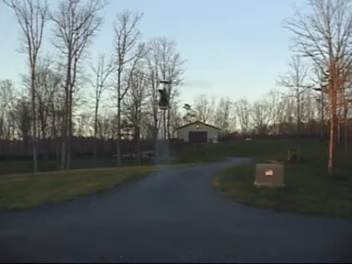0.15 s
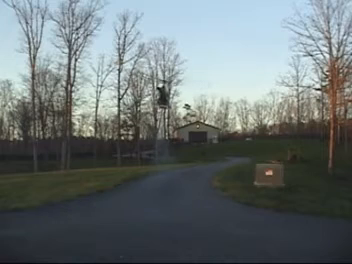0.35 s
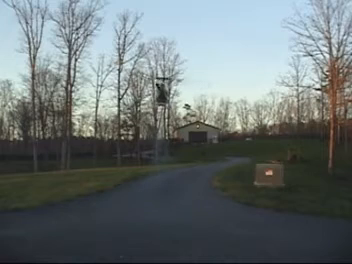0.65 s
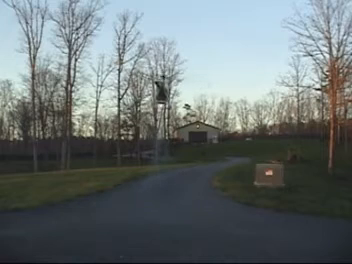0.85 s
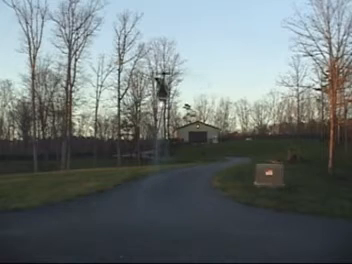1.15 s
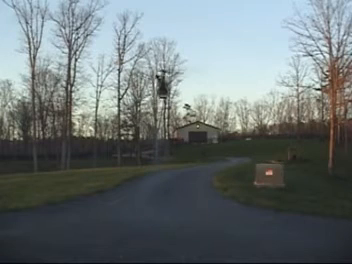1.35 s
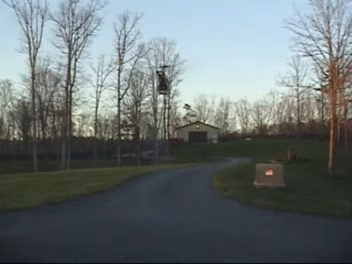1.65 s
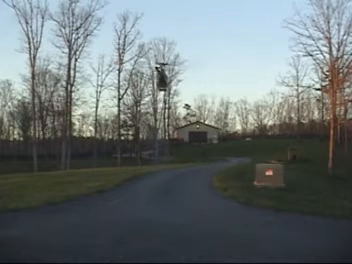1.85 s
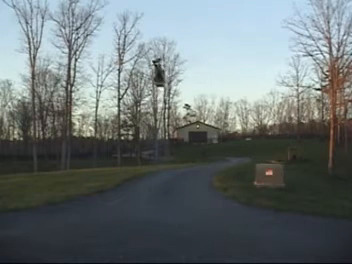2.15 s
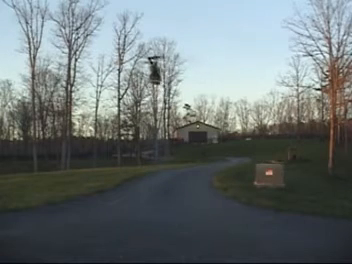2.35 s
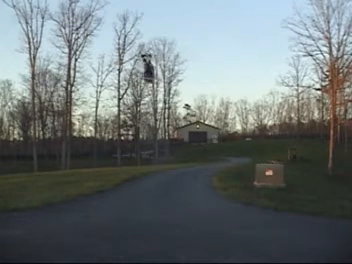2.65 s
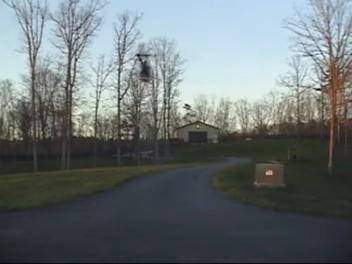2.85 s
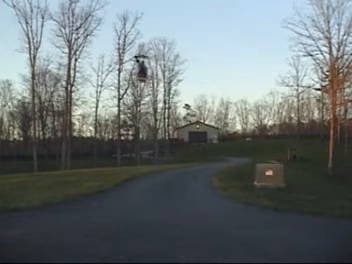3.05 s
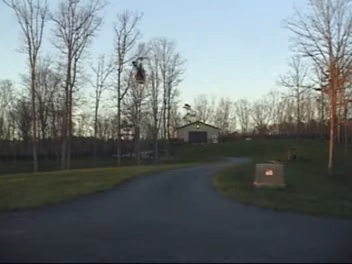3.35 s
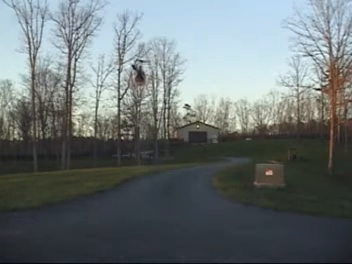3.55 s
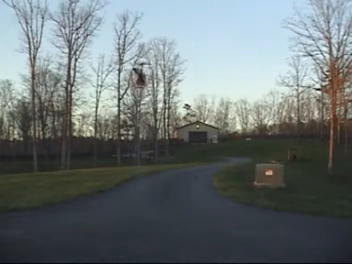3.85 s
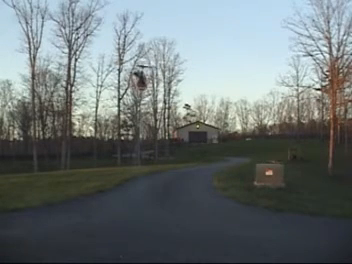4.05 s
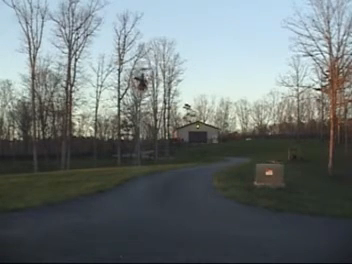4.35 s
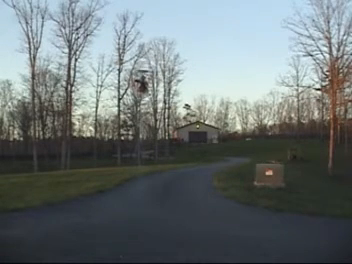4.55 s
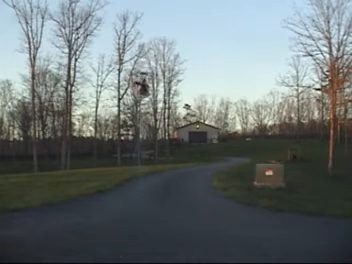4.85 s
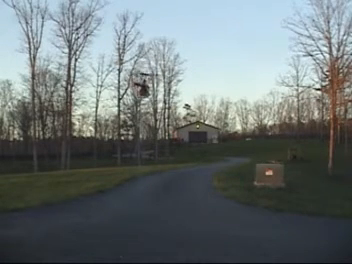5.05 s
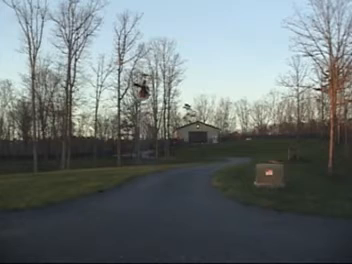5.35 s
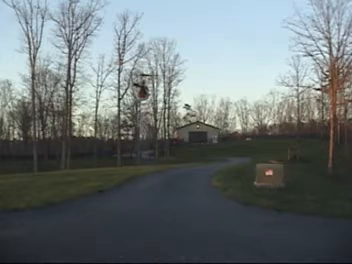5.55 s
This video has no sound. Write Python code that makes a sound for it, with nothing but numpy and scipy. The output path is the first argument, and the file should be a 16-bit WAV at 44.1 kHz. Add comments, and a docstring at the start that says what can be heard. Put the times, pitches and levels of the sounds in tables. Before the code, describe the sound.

A model helicopter's small engine buzzes and rasps throughout at an almost constant pitch, joined by whining gears and the rapid, hissing flutter of its blades. The sound shifts softly in colour during a short climb and descent, and a tinny exhaust ring grows a little as the throttle opens in the second half. It is heard in the open air, with a thin echo from nearby woods.

```python
"""A buzzing, rasping two-stroke glow engine: a model helicopter hovers, climbs a little and sinks back.
Each firing drives the exhaust and rings the silencer; the main gear's teeth whine as they mesh.
The rotor chops these tones, swishes and whistles once a turn.
The paved drive below reflects everything a moment later, so the colour sweeps with the height.
The throttle opens to stop the descent, and the exhaust grows louder and rings more."""
import sys
import numpy as np
from scipy import signal
from scipy.fft import rfft, irfft, next_fast_len
from scipy.io import wavfile
from scipy.ndimage import map_coordinates

SR = 44100
rng = np.random.default_rng(int(sys.argv[2]) if len(sys.argv) > 2 else 0)


def file_out(sig):
    """Save sig as 16-bit WAV at sys.argv[1]."""
    # one column per channel
    cols = np.atleast_2d(sig).T
    # limit, then scale
    lim = np.clip(cols, -1, 1)
    pcm = np.round(lim * 32767).astype(np.int16)
    wavfile.write(sys.argv[1], SR, pcm)


N = 250929
T = np.arange(N) / SR


def amp(db):
    """Decibels to gain."""
    return 10 ** (np.asarray(db) / 20)


def unit(x):
    """Scale to rms 1."""
    return x / np.sqrt(np.mean(x ** 2) + 1e-20)


def along(points, hz):
    """(f/Hz, value) points read on a log axis."""
    f, v = np.transpose(points)
    return np.interp(np.log(hz + 1), np.log(f + 1), v)


def wobble(knots_per_s):
    """Smooth random curve."""
    return map_coordinates(rng.standard_normal(int(N * knots_per_s / SR) + 4), [T * knots_per_s])


def filtered(x, response):
    """Apply a complex frequency response."""
    size = next_fast_len(N + 8192)
    return irfft(rfft(x, size) * response(np.fft.rfftfreq(size, 1 / SR)), size)[:N]


def resonate(x, modes):
    """Parallel resonances of alternating sign."""
    return filtered(x, lambda f: sum(
        (-1) ** k * amp(db) * 1j * f * width / (hz * hz - f * f + 1j * f * width)
        for k, (hz, width, db) in enumerate(modes)))


def noise(spectrum):
    """Coloured noise, rms 1."""
    return unit(filtered(rng.standard_normal(N), lambda hz: amp(along(spectrum, hz))))


def tone(cycles):
    """Sine on a cycle count, rms 1."""
    return np.sqrt(2) * np.sin(2 * np.pi * (cycles + rng.random()))


def offset(turns, moment):
    """Signed distance in turns from a moment of the revolution."""
    return (turns - moment + .5) % 1 - .5


def chopped(cycles, rotor, db, lower_db, upper_db):
    """Tone swayed once a rotor turn: sidebands of opposite sign, so mostly vibrato."""
    sway = np.exp(2j * np.pi * rotor)
    phasor = amp(db) + amp(upper_db) * sway - amp(lower_db) / sway
    return np.sqrt(2) * np.imag(phasor * np.exp(2j * np.pi * (cycles + rng.random())))


def climb(top_s=2.74, half_width_s=1.27):
    """Height: 0 in the hover, 1 at the top."""
    return np.exp(-((T - top_s) / half_width_s) ** 2)


def level(hover_db, climb_db, throttle_db, open_s=3.74, rise_s=0.26):
    """Level in dB, following the height and the throttle, which opens and stays open."""
    throttle = .5 + .5 * np.tanh((T - open_s) / rise_s)
    return hover_db + climb_db * climb() + throttle_db * throttle


# Echo decay: f/Hz, T60/s
TREE_DECAY = [(200, 0.57), (2000, 0.26), (10000, 0.037)]


def trees(x):
    """Thin diffuse echo from the wood's edge."""
    hz, t, spectra = signal.stft(rng.standard_normal(SR // 2), SR, nperseg=256)
    decay = amp(-60 * t / along(TREE_DECAY, hz)[:, None])
    tail = signal.istft(spectra * decay, SR, nperseg=256)[1]
    return signal.fftconvolve(x, tail / np.linalg.norm(tail))[:N]


def pavement(x, reflect, dull_hz, extra_ms):
    """Direct sound plus a late, duller reflection; each sound has its own slight extra delay."""
    hover_ms, creep_ms_per_s, climb_ms = 1.187, 0.0079, 0.24
    lag_ms = hover_ms + creep_ms_per_s * T + climb_ms * climb() + extra_ms
    dulled = filtered(x, lambda hz: 1 / np.sqrt(1 + (hz / dull_hz) ** 2))
    return x + reflect * map_coordinates(dulled, [(T - lag_ms / 1000) * SR], mode="mirror")


# Thrum: rotor order, level/dB
THRUM_TONES = [(1, -102), (2, -69.5), (3, -90), (4, -73), (5, -73.5), (6, -72.5), (10, -62.5)]


def rotor_thrum(rotor):
    """Faint low harmonics of the rotor speed."""
    return sum(amp(db) * tone(round(order) * rotor) for order, db in THRUM_TONES)


# Blade noise: f/Hz, relative density/dB
WASH_SPECTRUM = [(20, -18), (60, -16.5), (140, -11), (230, -11), (400, -7.5), (600, -7.5), (1200, -1.5),
                 (2500, 0), (4800, -6), (6300, -2), (9500, -4), (11000, -12), (13000, -21.5), (15000, -41)]
SWISH_SPECTRUM = [(500, -53), (3000, -49), (6500, -0.5), (10000, 0.5), (11500, -14), (15000, -42)]
# Wash level: hover/dB, change at top/dB, change on throttle/dB
WASH_LEVEL_DB = (-36.5, -0.02, -0.32)


def rotor_wash(rotor, swish_db=-1.5, swish_turns=0.077, beat_depth=0.033):
    """Wash that beats with both blades; a swish as the quieter blade comes forward."""
    beat = 1 + beat_depth * np.cos(2 * np.pi * 2 * (rotor - .26))
    wash = noise(WASH_SPECTRUM) * beat
    swish = noise(SWISH_SPECTRUM) * np.exp(-(offset(rotor, 0.773) / swish_turns) ** 2)
    return amp(level(*WASH_LEVEL_DB)) * (wash + amp(swish_db) * swish)


# Whistles: moment of top pitch/turns, top f/Hz, peak level/dB, half-width/turns
EDGE_TONES = [(0.312, 9540, -38.5, 0.18), (.33, 8215, -40, 0.085), (.80, 13400, -61, .12)]


def blade_whistles(rotor, mach=0.22, waver=0.017, lead_turns=0.076, scatter_db=1.5):
    """Edge tones on a blade, Doppler-lifted into an arc on each swing towards the listener."""
    out = np.zeros(N)
    for moment, top_hz, db, width_turns in EDGE_TONES:
        turns = offset(rotor, moment)
        hz = top_hz * (1 - mach) / (1 - mach * np.cos(2 * np.pi * turns))
        hz *= 1 + waver * wobble(1500) + 0.011 * wobble(30)
        beam = np.exp(-((turns + lead_turns) / width_turns) ** 2)
        out += amp(db + scatter_db * wobble(40)) * beam * tone(np.cumsum(hz) / SR)
    wash_db = level(*WASH_LEVEL_DB)
    return amp(2 * (wash_db - wash_db.mean())) * out  # swells with the wash, twice the dB


# Faint drive-train tones: crank order, relative level/dB
DRIVE_TONES = [(.66, -65), (2.52, -58.5), (3.52, -60), (10.89, -55)]
# Gear gain: hover/dB, change at top/dB, change on throttle/dB
GEAR_GAIN_DB = (-0.95, -1.2, 0)


def gear_whine(crank, rotor, teeth=90):
    """Main gear mesh, swayed by the rotor and by the pinion on the crankshaft."""
    mesh = teeth * rotor + .04 * wobble(45)
    whine = chopped(mesh, rotor, db=-45.5, lower_db=-58, upper_db=-50)
    pinion = amp(-48) * tone(mesh - crank)
    overtone = chopped(2 * mesh + .12 * wobble(120), rotor, db=-53.5, lower_db=-55, upper_db=-56)
    drive = sum(amp(db) * tone(order * crank + 0.05 * wobble(20)) for order, db in DRIVE_TONES)
    return amp(level(*GEAR_GAIN_DB)) * (whine + pinion + overtone + drive)


def firings(crank, scatter_db):
    """One impulse a revolution, uneven in strength and sign, rms 1."""
    fired = np.flatnonzero(np.diff(np.floor(crank)))
    out = np.zeros(N)
    out[fired] = amp(scatter_db * rng.standard_normal(len(fired)))
    out[fired] *= np.sign(rng.standard_normal(len(fired)))
    return unit(out)


# Silencer wall: f/Hz, width/Hz, relative gain/dB
WALL_MODES = [(4083, 140, 7), (5600, 400, -14)]
# Ring level: hover/dB, change at top/dB, change on throttle/dB
RING_LEVEL_DB = (-47.5, -0.5, 3.5)


def silencer_ring(crank):
    """Firings ring the silencer's thin wall."""
    ring = resonate(firings(crank, scatter_db=2.5), WALL_MODES)
    return amp(level(*RING_LEVEL_DB)) * unit(ring)


# Silencer and airframe: f/Hz, width/Hz, relative gain/dB
SILENCER_MODES = [(740, 580, -7.5), (1330, 1100, -9.5), (1953, 190, 6.5), (3190, 610, -4), (4125, 340, -3),
                  (5410, 340, -1.5), (7990, 330, -4.5)]
# Rasp level: hover/dB, change at top/dB, change on throttle/dB
RASP_LEVEL_DB = (-40, -0.4, 1)


def exhaust_rasp(crank, puff_turns=0.39, puff_gain=1.2):
    """Each firing sends a crack and a puff of gas through the silencer."""
    puffs = unit(rng.standard_normal(N) * np.exp(-(crank % 1) / puff_turns))
    cracks = firings(crank, scatter_db=3.5)
    rasp = resonate(cracks + puff_gain * puffs, SILENCER_MODES)
    return amp(level(*RASP_LEVEL_DB)) * unit(rasp)


# Exhaust tones, relative levels: crank order, carrier/dB, lower sideband/dB, upper sideband/dB
FIRING_TONES = [(1, -50, -74, -74), (2, -58, -72, -65), (3, -57, -56, -56), (4, -44.1, -62, -48.8),
                (5, -53.5, -64, -61), (6, -50.8, -56.5, -59), (7, -49.5, -51, -51), (8, -62, -60, -62),
                (9, -62, -59, -60)]
# Buzz gain: hover/dB, change at top/dB, change on throttle/dB
BUZZ_GAIN_DB = (-0.8, 0.46, 0.94)


def exhaust_buzz(crank, rotor, jitter_turns=.004, flicker_db=0.14):
    """Firing harmonics, chopped by the rotor; uneven combustion makes each flicker."""
    crank = crank + jitter_turns * wobble(60)
    buzz = sum(amp(flicker_db * wobble(25)) * chopped(round(order) * crank, rotor, *levels_db)
               for order, *levels_db in FIRING_TONES)
    passes = 2 * rotor  # two blades pass under the exhaust each turn
    buzz += amp(-60) * tone(crank + passes)
    buzz += amp(-59.5) * tone(crank + 2 * passes)
    buzz += amp(-62) * tone(2 * crank + passes)
    return amp(level(*BUZZ_GAIN_DB)) * buzz


# Engine speed, up into the climb, sagging on descent, recovering: t/s, f/Hz
ENGINE_SPEED = [(0, 230.45), (1.5, 232.07), (2.35, 231.69), (3.5, 230.43), (4.55, 230.93), (5.1, 231.79),
                (5.69, 231.84)]


def scene(gear_ratio=9.614):
    """One crankshaft drives every part; crank and rotor count turns."""
    engine_hz = np.interp(T, *np.transpose(ENGINE_SPEED))
    crank = np.cumsum(engine_hz) / SR
    rotor = crank / gear_ratio
    buzz = exhaust_buzz(crank, rotor)
    whine = gear_whine(crank, rotor)
    thrum = rotor_thrum(rotor)
    silencer = exhaust_rasp(crank) + silencer_ring(crank)
    blades = thrum + rotor_wash(rotor) + blade_whistles(rotor)
    helicopter = (pavement(blades, reflect=0.33, dull_hz=4500, extra_ms=0.063)
                  + pavement(whine, reflect=0.63, dull_hz=6000, extra_ms=0.098)
                  + pavement(silencer, reflect=0.55, dull_hz=3980, extra_ms=0)
                  + pavement(buzz, reflect=0.69, dull_hz=6000, extra_ms=0.048))
    return (helicopter + amp(-20) * trees(helicopter))[None]


def record(dry, top_hz=15150):
    """Brick-wall low-pass."""
    return filtered(dry[0], lambda hz: hz < top_hz)[None]


dry = scene()
out = record(dry)
file_out(out)
```